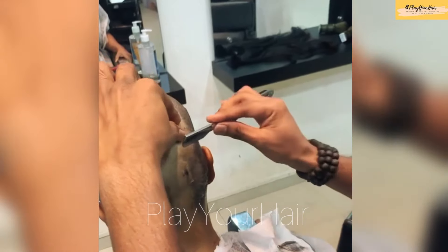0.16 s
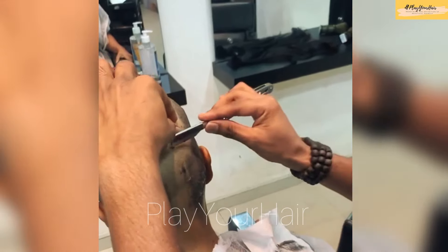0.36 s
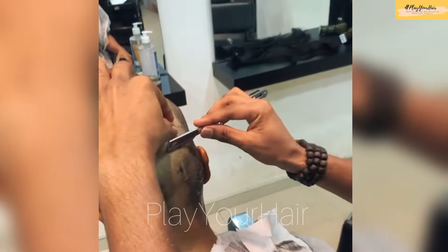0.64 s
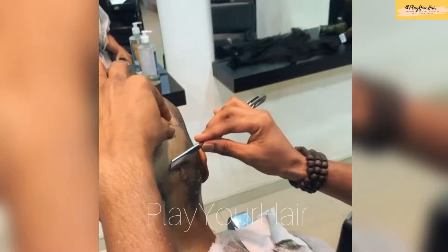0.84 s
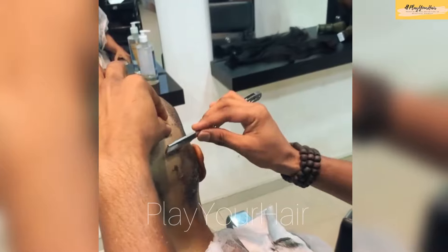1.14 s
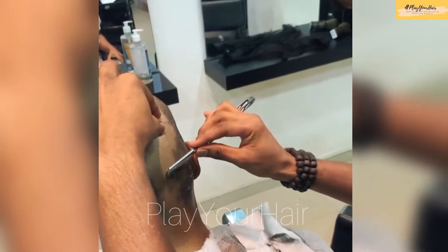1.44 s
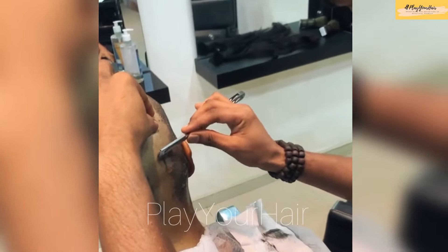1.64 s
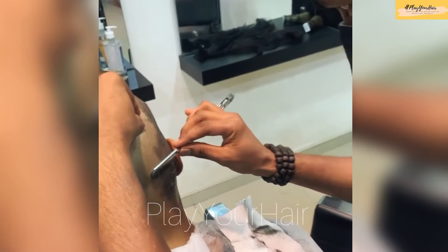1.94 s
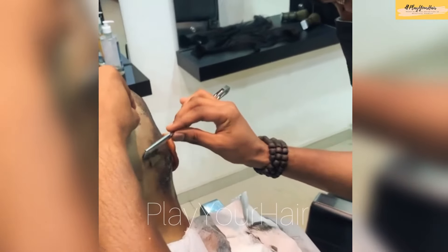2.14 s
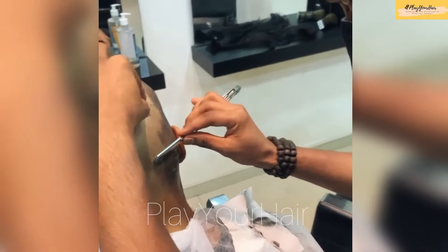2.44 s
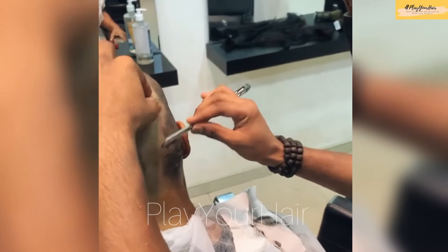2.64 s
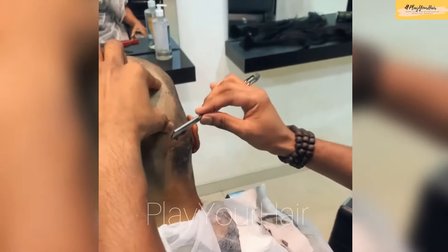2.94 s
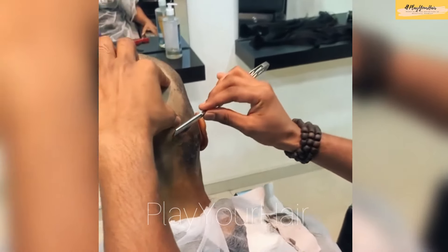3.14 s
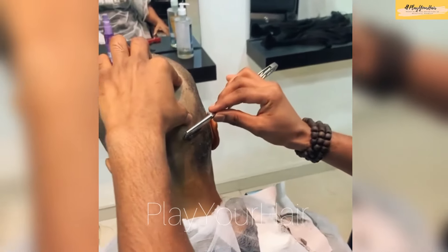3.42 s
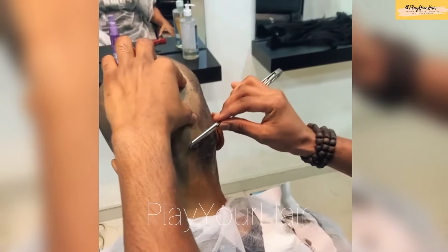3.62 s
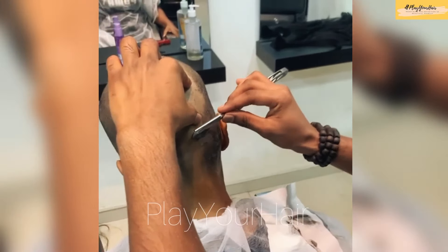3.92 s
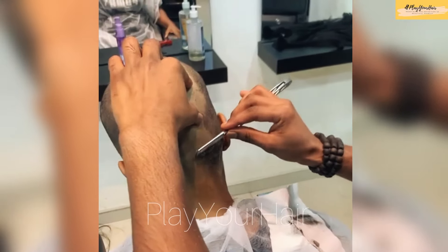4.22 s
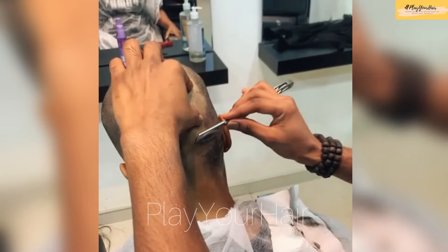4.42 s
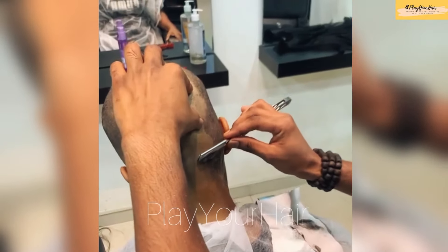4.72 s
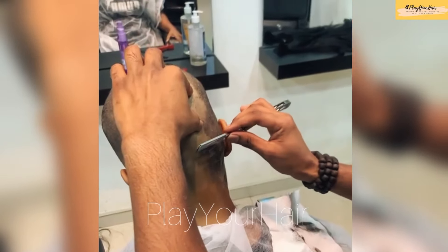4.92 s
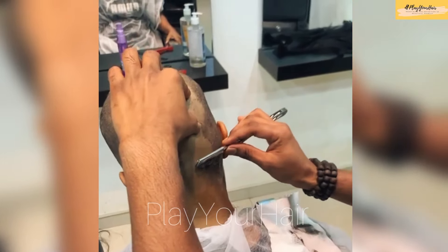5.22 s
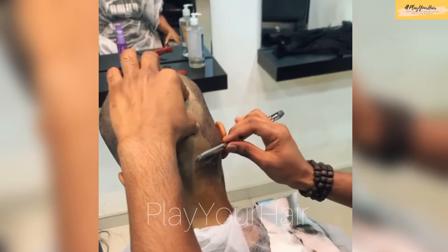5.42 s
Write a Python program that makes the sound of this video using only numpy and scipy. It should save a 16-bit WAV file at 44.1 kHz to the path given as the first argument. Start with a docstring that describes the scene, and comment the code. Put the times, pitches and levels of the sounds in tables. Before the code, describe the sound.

Quick gritty scrapes of a steel blade on stubbly skin, bright with a thin metallic ring, begin lightly, strengthen, then fade into a pause of over a second. Tiny ticks and cloth rustle fill it before the loudest crisp strokes arrive. The microphone is close in a salon with a short reverberant tail, over distant wavering engine drone and quiet hiss.

```python
"""Scalp shave with a straight razor

A straight razor scrapes stubble off a scalp in quick short strokes, with light return drags between them.
Each cut hair is a click that rings the razor's resonances; the stiffest hairs give way in louder bursts.
Small ticks and rustles fill the pause, and a short noisy tail puts them and the razor in a room.
Behind lie street engines as wavering tones, a steady low hum, and noise shaped into rumble and hiss."""
import sys
import numpy as np
from scipy import signal
from scipy.fft import rfft, irfft
from scipy.io import wavfile

SR = 44100
rng = np.random.default_rng(int(sys.argv[2]) if len(sys.argv) > 2 else 0)


def master(y):
    """Save y as 16-bit WAV."""
    cut = np.clip(np.atleast_2d(y).T, -1, 1)
    pcm = np.round(cut * 32767)  # scale
    wavfile.write(sys.argv[1], SR, pcm.astype(np.int16))


def invert_db(x):
    """Field ratio 10**(x/20) for x, a level in decibels (scalar or array-like)."""
    u = np.asarray(x, float) / 20
    return 10 ** u


N = 245195

# How loosely the razor is held, so how freely its edge rings. Each row: time in seconds, looseness in dB.
LOOSENESS = [(0.25, -5), (0.58, -3), (0.77, 9.5), (0.92, -2), (1.2, -9), (1.8, -9), (2.45, -11), (3.2, -5),
             (4.6, 5.5), (5.0, 4), (5.5, 6)]
# Where the blade meets the skin. Each row: time in seconds, lean in dB toward the heel (+) or the middle (-).
CONTACT = [(0.28, -1), (0.58, 4), (0.77, 0.5), (0.9, 1.5), (1.2, 6.5), (1.5, 4), (1.83, 5.5), (2.13, 2),
           (2.47, 2), (2.8, -6.5), (3.12, -11), (3.24, 10.5), (4.6, -7.5), (4.88, -2), (5.16, -3),
           (5.45, -2)]
# How dry and crisp the stubble under the blade is. Each row: time in seconds, crispness in dB.
CRISPNESS = [(0.28, -1), (0.46, 8), (0.58, 1), (0.77, 6), (0.9, 2.5), (1.2, -5), (1.5, -5), (1.83, -6.5),
             (2.13, -1.5), (2.47, 2), (2.8, -1), (3.2, 1.5), (4.6, 0.5), (4.87, 7), (5.13, -3), (5.2, 3),
             (5.41, -1), (5.48, 0.5)]
# How loud each region of the razor is fed, before its trim in razor().
# The rows are lower blade, skin side, heel, edge and crackle. Each row: base gain in dB, then the dB added
# per dB of pressure, looseness, contact, crispness, and stroke level over -45 dB.
REGION_GAINS = [(-4.5, 0.66, -0.085, 0.19, .01, 0.0251), (-12, 1.17, -0.069, -0.23, .01, -0.1236),
                (-14, 0.59, -.1, 0.72, .01, -0.0646), (-20.5, 0.52, 0.96, -0.038, 0.11, -0.02),
                (-13.5, 0.54, 0.063, 0.15, 0.77, -.2)]
# What a drag adds to each region, in dB, in the order of REGION_GAINS.
DRAG_COLOUR_DB = [-5, 1, -4, 2.5, 4.5]
# Resonances of each region of the razor.
# Each row: pitch in Hz, width in Hz, strength in dB relative to the other rows (per Hz of width).
SKIN_MODES = [(2487, 70, 0), (2641, 150, 1), (2890, 280, -6.5)]
HEEL_MODES = [(2974, 340, 1), (3400, 110, -4), (3820, 440, -1)]
LOWER_MODES = [(4455, 200, -1.5), (4920, 860, -6), (5230, 440, 0.5), (5500, 220, -7)]
TIP_MODES = [(7055, 170, -7.5), (7410, 300, -1.5)]
BLADE_MODES = [(6070, 310, -7), (6240, 680, 1.5), (6550, 620, 1)]
EDGE_MODES = [(11520, 510, 0.1), (11750, 680, 4), (11200, 610, -2)]
CRACKLE_MODES = [(8470, 1200, -0.5), (9600, 730, 2.5), (12200, 1600, -4), (13600, 1400, -15),
                 (15000, 1800, -2.5)]


def razor():
    """The strokes carry the stubble clicks into the regions of the razor, and each region rings in its own way."""
    blade_db, pressure_db, dragging = hand()
    over_45_db = np.maximum(blade_db + 45, -25)
    controls = [np.ones(N), pressure_db, *in_time(LOOSENESS), *in_time(CONTACT), *in_time(CRISPNESS), over_45_db]
    region_db = np.array(REGION_GAINS) @ controls + np.outer(DRAG_COLOUR_DB, dragging)
    lower_db, skin_db, heel_db, edge_db, crackle_db = region_db

    fine_hairs = invert_db(blade_db) * stubble(per_s=4000, spread_db=4.0, clump_db=1.0, friction_db=-8)
    # a drag bends stiff hairs more than it cuts them
    clicks = fine_hairs + snaps(blade_db - 3 * dragging)
    # the top is a spray of noise that follows the clicks
    recent_power = signal.lfilter([.02], [1, -.98], clicks ** 2 + 1e-18)
    spray = np.sqrt(recent_power) * rng.standard_normal(N)

    skin = steep(body(clicks * invert_db(skin_db), SKIN_MODES, scatter_db=3.0), 2130, "high")
    # dull contact noise under firm pressure
    scalp = band(clicks * invert_db(skin_db - 9.0), 1050, 4200)
    heel = steep(body(clicks * invert_db(heel_db), HEEL_MODES, scatter_db=4.0), 2900, "high")
    lower = steep(body(clicks * invert_db(lower_db), LOWER_MODES, scatter_db=0.0), 4750, "high")
    # the freer the edge rings, the brighter the blade
    tip = body(clicks * invert_db(1.5 + 0.3 * edge_db), TIP_MODES, scatter_db=9.0)
    blade = body(clicks, BLADE_MODES, scatter_db=7.5) + tip
    blade = steep(steep(blade, 6350, "high"), 6830, "low")
    edge = steep(body((spray + clicks) * invert_db(edge_db), EDGE_MODES, scatter_db=5.0), 11900, "low")
    crackle = steep(body(spray * invert_db(crackle_db - 1.0), CRACKLE_MODES, scatter_db=1.0), 7340, "high")
    return scalp + skin + heel + lower + blade + edge + crackle


# Cutting strokes; a stroke with a flat top, a stutter or a lingering end takes more than one row.
# Each row: start in seconds, rise in seconds, fall in seconds, peak level of the clicks in dB,
# pressure half way through in dB.
STROKES = [(0.211, 0.014, 0.017, -52, -2), (0.24, 0.018, 0.078, -48, 0), (0.44, .018, 0.02, -48.5, 1.5),
           (0.537, 0.023, 0.05, -42.5, 3.5), (0.565, 0.026, 0.059, -39.5, 2.5), (0.725, .025, .045, -43, 3),
           (0.842, 0.016, 0.057, -41.5, 4), (0.9, 0.033, .04, -46.5, -1), (1.142, 0.047, 0.037, -36.5, -6),
           (1.21, 0.013, 0.045, -41.5, -4), (1.44, 0.031, 0.057, -38.5, -8), (1.48, 0.037, .07, -35, -3),
           (1.76, .02, .04, -39.5, -11), (1.785, 0.043, .05, -33, -7), (1.85, 0.024, 0.046, -41, -4.5),
           (2.065, 0.028, 0.063, -39.5, -10), (2.11, 0.033, 0.054, -40, -4),
           (2.409, .03, 0.059, -43.5, -7.5), (2.46, .03, 0.052, -46.5, -3), (2.742, 0.038, 0.039, -42, -6),
           (2.8, 0.028, 0.051, -46, -4.5), (3.092, 0.034, 0.022, -47.5, -7), (3.15, 0.031, 0.11, -53, -2.5),
           (4.587, 0.011, .015, -34.5, -6.5), (4.615, .012, 0.068, -56.5, 1.5),
           (4.828, 0.029, 0.02, -35.5, -5), (4.892, 0.008, 0.018, -30, -0.5), (4.92, .01, 0.051, -57.5, 6),
           (5.105, 0.016, .016, -34, -8), (5.134, 0.036, 0.045, -30, 2.5), (5.21, 0.0084, 0.059, -51, 7.5),
           (5.396, .014, 0.0081, -30, -12.5), (5.424, .012, 0.076, -34, 4), (5.51, .01, 0.042, -57, 9.5)]
# Light return drags. Each row: start in seconds, length in seconds, peak level of the clicks in dB,
# pressure half way through in dB.
DRAGS = [(1.036, 0.059, -50, -5), (1.304, 0.079, -47, -15), (1.618, 0.1, -47, -20),
         (1.96, 0.071, -49, -11.5), (2.271, 0.094, -57, -16), (2.614, 0.072, -59.5, -19),
         (2.967, 0.064, -56, -20), (4.991, 0.067, -48.5, -13), (5.274, 0.024, -50, 1),
         (5.292, 0.052, -43.5, -8)]


def hand():
    """Level of the blade on the skin and its pressure in dB, and whether it only drags; the loudest row leads."""
    rise_share = 0.37   # of a drag's length
    dig_in_db = 3   # pressure gained from the start to the end of a row
    drags = [(s, rise_share * length, (1 - rise_share) * length, db, press_db)
             for s, length, db, press_db in DRAGS]
    level_db, pressure_db, dragging = np.full(N, -120.), np.zeros(N), np.zeros(N)
    for k, (s, rise_s, fall_s, db, press_db) in enumerate(STROKES + drags):
        # each pair: rising side, falling side
        shape_db, progress = swell(s + rise_s, rise_s, fall_s, edges_db=(12.5, 17.5), powers=(1.96, 2.03),
                                   ends_db_per_s=(1508, 600))
        row_db = db + shape_db
        leads = row_db > level_db
        pressure_db[leads] = (press_db + dig_in_db * (progress - .5))[leads]
        dragging[leads] = k >= len(STROKES)
        level_db = np.maximum(level_db, row_db)
    return level_db, pressure_db, dragging


def stubble(per_s, spread_db, clump_db, friction_db):
    """Hairs are cut at random moments; the blade sticks and slips, so cuts clump, over fine friction; rms 1."""
    sizes = invert_db(spread_db * np.minimum(rng.exponential(1, N), 2.5))
    cut = rng.random(N) < per_s / SR
    clumps = invert_db(clump_db * np.tanh(drift(280)))
    hairs = rms_one(sizes * cut * clumps)
    return rms_one(hairs + invert_db(friction_db) * rng.standard_normal(N))


# The loudest stiff hairs. Each row: time in seconds, height of the burst in dB before the razor rings.
SNAPS = [(0.223, -46), (0.2446, -35.5), (0.2577, -30), (0.4535, -42), (0.5516, -34), (0.5876, -27),
         (0.7335, -42), (0.8504, -33), (0.8632, -30.5), (0.9342, -36.5), (1.0447, -43), (1.15, -33),
         (1.171, -28.5), (1.2256, -26), (1.2315, -25), (1.3221, -34), (1.449, -39), (1.4538, -37),
         (1.4744, -30), (1.5217, -25.5), (1.7684, -38), (1.7821, -28.5), (1.8184, -33), (2.0659, -41),
         (2.078, -29), (2.1351, -29), (2.4125, -41), (2.4691, -34), (2.7755, -49), (2.7839, -33.5),
         (3.1162, -38.5), (3.1468, -38), (3.1656, -42), (3.2303, -45), (3.2445, -41), (4.5791, -44),
         (4.5903, -31), (4.5984, -29), (4.605, -27.5), (4.612, -27), (4.6354, -41.5), (4.6558, -43),
         (4.7982, -46), (4.8326, -42), (4.8424, -38), (4.8518, -23), (4.8657, -19), (4.8728, -22),
         (4.902, -21.5), (5.1158, -21), (5.1382, -21.5), (5.1734, -21.5), (5.1822, -26), (5.199, -26),
         (5.2988, -38), (5.4005, -29), (5.4061, -22.5), (5.4243, -31), (5.431, -21.5), (5.4381, -25),
         (5.4795, -28), (5.514, -35.5)]


def snaps(blade_db):
    """A stiff hair bends and gives way in a noisy burst of a few milliseconds that swells and dies."""
    per_s, over_stroke_db, spread_db = 160, 3, 2.5   # the other stiff hairs, at random moments
    r = np.exp(-1 / (0.0004 * SR))   # a burst peaks after about 0.4 ms
    happens = rng.random(N) < per_s / SR
    starts = happens * invert_db(blade_db + over_stroke_db + spread_db * rng.standard_normal(N))
    starts[[round(s * SR) for s, db in SNAPS]] = invert_db(np.array(SNAPS)[:, 1])
    bursts = np.e * signal.lfilter([1 - r], [1, -2 * r, r * r], starts + 1e-18)
    return bursts * rng.choice([-1, 1], N)


def body(clicks, modes, scatter_db):
    """Each click strikes every resonance with a strength and sign of its own; total energy kept."""
    total = np.sqrt(sum(invert_db(2 * db) * width for hz, width, db in modes))
    out = 0
    for hz, width, db in modes:
        own = invert_db(scatter_db * rng.standard_normal(N)) * rng.choice([-1, 1], N)
        share = invert_db(db) * np.sqrt(width) / total
        out = out + share * resonate(clicks * rms_one(own), hz, width)
    return out


# Small ticks in the pause. Each row: time in seconds, level in dB before a lift of 14 dB, pitch in Hz.
TICKS = [(3.5407, -44.5, 1458), (3.818, -49, 4320), (3.8503, -48, 2430), (3.8705, -46, 2510)]


def ticks():
    """Short dry ticks: a ring of a few cycles, a bright crack and a brief noisy tail."""
    out = np.zeros(N)
    for s, db, hz in TICKS:
        click = np.zeros(N)
        click[round(s * SR)] = invert_db(db + 14.0)
        fading = signal.lfilter([1], [1, -np.exp(-1 / (0.02 * SR))], click + 1e-18)   # over 20 ms
        tail = fading * rng.standard_normal(N)
        out += resonate(click, hz, 0.22 * hz)
        out += invert_db(-12) * band(click, 1500, 6000)
        out += invert_db(-30) * resonate(tail, hz, .6 * hz)
    return out


# Cloth and skin rustle in the pause. Each row: peak time in seconds, rise in seconds, fall in seconds,
# centre pitch at the peak in Hz, level at the peak in dB.
RUSTLES = [(3.812, .07, .08, 4400, -66), (3.878, .01, .08, 2500, -64), (4.33, .14, .12, 1800, -66),
           (4.285, .035, .06, 5450, -64), (4.3, .1, .08, 3950, -69), (4.25, .15, .2, 1100, -69),
           (4.3, .1, .1, 2700, -69), (3.622, .025, .045, 6100, -68)]


def rustles():
    """Fine grains of noise ride on a sinking tone, which makes a broad band that slides down."""
    sag_per_s, width_share = .7, .12   # both as shares of the centre pitch
    out = np.zeros(N)
    for s, rise_s, fall_s, hz, db in RUSTLES:
        shape_db, _ = swell(s, rise_s, fall_s, edges_db=(9, 9), powers=(1.3, 1.3), ends_db_per_s=(400, 400))
        sliding_hz = hz * (1 - sag_per_s * np.clip(np.arange(N) / SR - s, -rise_s, fall_s))
        grains = rng.standard_normal(N) * invert_db(2.1 * drift(100))
        envelope = rms_one(band(grains, 10, width_share * hz))
        tone = np.sqrt(2) * np.sin(2 * np.pi * np.cumsum(sliding_hz) / SR)
        out += invert_db(db + shape_db) * envelope * tone
    return out


def room(x):
    """A short diffuse tail of decaying noise, 12 dB under a click that sets it off."""
    t60_s = 0.18   # time to fall by 60 dB
    t = np.arange(int(.3 * SR)) / SR
    tail = rng.standard_normal(len(t)) * invert_db(-60 * t / t60_s) * (t > .002)
    return invert_db(-12) * signal.fftconvolve(x, tail / np.sqrt(np.sum(tail ** 2)))[:N]


# Swells of street engine drone. Each row: peak time in seconds, rise in seconds, fall in seconds,
# middle pitch in Hz, middle level at the peak in dB.
DRONES = [(0.14, 0.39, 0.24, 158, -50.5), (0.44, 0.16, 0.24, 151, -46.5), (1.17, 0.43, 0.28, 154, -52),
          (0.37, 0.079, 0.19, 94, -47.5), (0.1, .3, 0.73, 63, -55), (1.4, .4, 0.32, 57.5, -57.5),
          (3.66, 0.19, 0.25, 90, -56), (4, .4, 0.55, 130, -61.5), (1, .4, 0.34, 116, -46.5),
          (1.865, 0.58, 0.32, 108, -50), (0.97, 0.32, 0.29, 190, -55), (1.422, .1, 0.058, 188, -49.5),
          (1.7, 0.16, 0.055, 191, -46.5), (1.93, 0.16, .5, 187, -48.5), (2.52, .25, .12, 182, -50.5),
          (1.7, 0.29, 0.86, 138, -52), (1.67, 0.14, .1, 63.5, -49), (1.84, 0.1, 0.29, 71.5, -46.5),
          (2.5, 0.18, 0.48, 70, -49), (2.995, 0.49, 0.34, 69.2, -41), (3.42, .12, 0.097, 69.4, -54),
          (1.05, 0.55, 0.45, 230, -63), (2.15, 0.33, 0.62, 251, -60), (2.9, 0.072, 0.23, 318, -61),
          (3.17, 0.55, 0.32, 260, -62), (2.95, 0.17, .4, 392, -66), (3.1, 0.14, 1.55, 110.5, -58),
          (4.68, .15, 0.91, 95, -57), (2.77, 0.6, 0.81, 140, -61), (3.3, .2, 0.88, 182, -63.5),
          (5.11, 0.51, 0.43, 62.6, -53.5), (4.59, 0.2, 1, 438, -69)]


def drones():
    """Each engine drone is a near-sine, wavering in pitch and level, that swells and fades."""
    out = np.zeros(N)
    for s, rise_s, fall_s, hz, db in DRONES:
        shape_db, _ = swell(s, rise_s, fall_s, edges_db=(13, 13), powers=(1.3, 1.3), ends_db_per_s=(212, 212))
        level = np.sqrt(2) * invert_db(db + shape_db + 1.0 * drift(3))
        wavering_hz = hz * (1 + 0.006 * drift(4))
        out += level * np.sin(2 * np.pi * np.cumsum(wavering_hz) / SR)
    return out


def hum():
    """A very low sine of 28.5 Hz stays throughout, its level wavering slowly around -56.5 dB."""
    return np.sqrt(2) * invert_db(-56.5 + 1.0 * drift(1)) * np.sin(2 * np.pi * 28.5 * np.arange(N) / SR)


# Colour of the rumble. Each row: frequency in Hz, relative level in dB.
RUMBLE_COLOUR = [(12, -4.5), (22, 4.5), (33, -14), (45, -4.5), (60, 1), (85, -10), (110, -2), (190, -4),
                 (230, -11), (320, -15), (450, -22.5), (900, -25), (1800, -33.5), (2500, -36.5),
                 (5500, -76)]


def rumble():
    """Low noise whose level barely sways."""
    return invert_db(-50.5 - 0.12 * drift(0.54)) * coloured(RUMBLE_COLOUR)


# Colour of the room's hiss. Each row: frequency in Hz, relative level in dB per Hz.
HISS_COLOUR = [(710, -38), (1200, -4.5), (2190, -0.5), (2490, -2), (3160, -3), (6860, -3.5), (9570, -2),
               (14100, -2.5), (15700, -2.5)]


def hiss():
    """Steady noise, weak in the bass and nearly even above."""
    return invert_db(-62.5) * coloured(HISS_COLOUR)


def swell(peak_s, rise_s, fall_s, edges_db, powers, ends_db_per_s):
    """dB re peak of a rise and fall that drops steeply outside, and the progress through it (0-1)."""
    late = np.arange(N) / SR - peak_s
    side = (late > 0).astype(int)   # 0 while rising, 1 while falling
    span = np.array([rise_s, fall_s])[side]
    inside = np.minimum(np.abs(late), span)
    shape_db = -np.array(edges_db)[side] * (inside / span) ** np.array(powers)[side]
    shape_db -= np.array(ends_db_per_s)[side] * (np.abs(late) - inside)
    return shape_db, np.clip((late + rise_s) / (rise_s + fall_s), 0, 1)


def rms_one(x):
    """Scale to rms 1."""
    return x / np.sqrt(np.mean(x ** 2) + 1e-20)


def in_time(rows):
    """Columns of a table at every sample, joined by straight lines."""
    s, *columns = np.transpose(rows)
    return [np.interp(np.arange(N) / SR, s, c) for c in columns]


def drift(rate):
    """Slow random wander, rms 1; a higher rate wanders faster."""
    r = np.exp(-40 * np.pi * rate / SR)   # made at every 20th sample
    start = 4000   # skips the filter's settling
    noise = rng.standard_normal(N // 20 + start + 2)
    slow = signal.lfilter([1], [1, -2 * r, r * r], noise)[start:]
    return np.interp(np.arange(N) / 20, np.arange(len(slow)), rms_one(slow))


def coloured(points):
    """Noise with the given spectrum, rms 1."""
    hz, db = np.transpose(points)
    grid = np.fft.rfftfreq(N, 1 / SR) + 1
    gain = invert_db(np.interp(np.log(grid), np.log(hz), db))
    return rms_one(irfft(rfft(rng.standard_normal(N)) * gain, N))


def resonate(x, hz, width):
    """One resonance whose response to a unit click has unit energy."""
    r, w = np.exp(-np.pi * width / SR), 2 * np.pi * hz / SR
    ring = signal.lfilter([1, 0, -1], [1, -2 * r * np.cos(w), r * r], x + 1e-18)
    return ring * np.sqrt((1 - r * r) / 2)


def band(x, low_hz, high_hz):
    """Gentle band-pass."""
    edges_hz = [low_hz, min(high_hz, SR / 2.1)]
    return signal.sosfilt(signal.butter(2, edges_hz, "band", fs=SR, output="sos"), x)


def steep(x, hz, kind):
    """Steep high- or low-pass."""
    return signal.sosfilt(signal.butter(6, hz, kind, fs=SR, output="sos"), x)


def scene():
    """Razor, ticks and rustles in the room, over drones, hum, rumble and hiss."""
    near = razor() + ticks() + rustles()
    background = drones() + hum() + rumble() + hiss()
    return (near + room(near) + background)[None]


def band_limit(x):
    """A steep low-pass at the top of the band."""
    return signal.sosfilt(signal.butter(12, 15990, fs=SR, output="sos"), x)


def record(dry):
    """A sharp low-pass takes off everything above about 15.8 kHz."""
    top_cut = signal.sosfilt(signal.ellip(12, .3, 70, 15770, fs=SR, output="sos"), dry)
    return band_limit(top_cut)


dry = scene()
out = record(dry)
master(out)
```